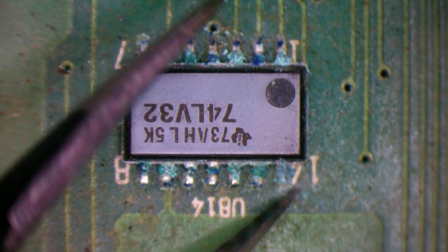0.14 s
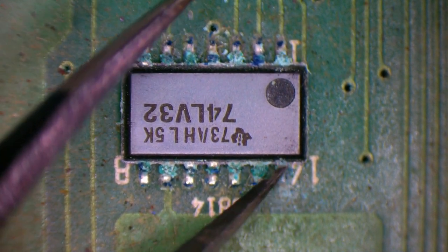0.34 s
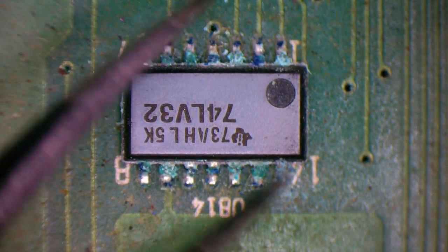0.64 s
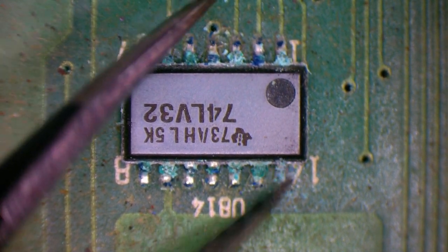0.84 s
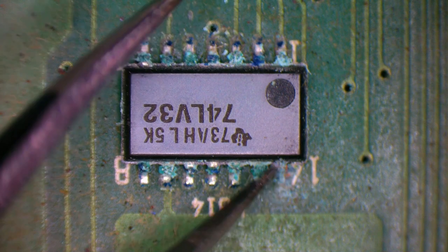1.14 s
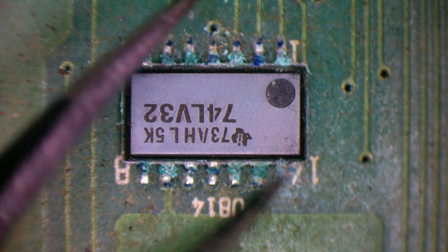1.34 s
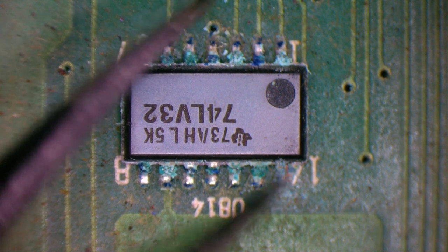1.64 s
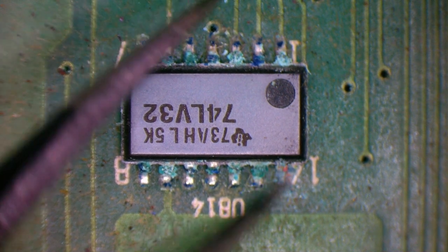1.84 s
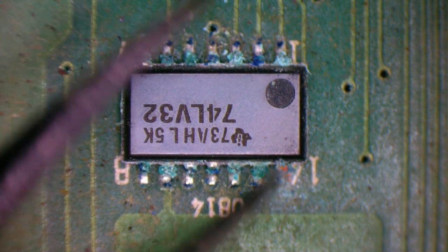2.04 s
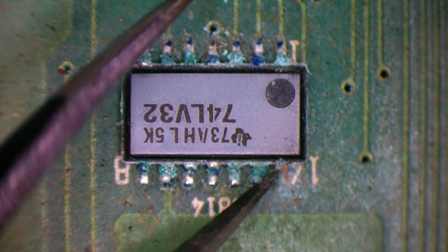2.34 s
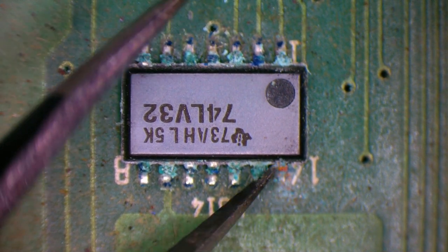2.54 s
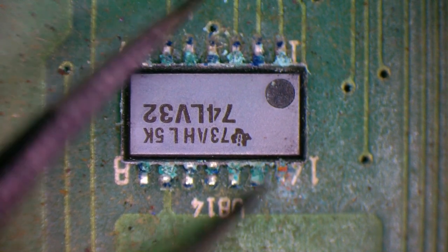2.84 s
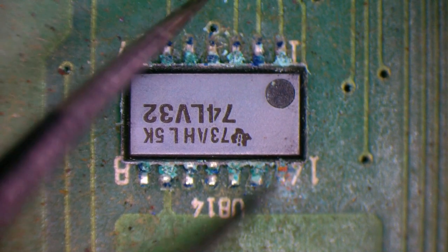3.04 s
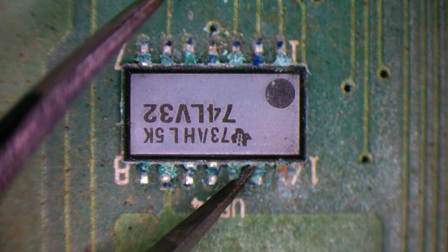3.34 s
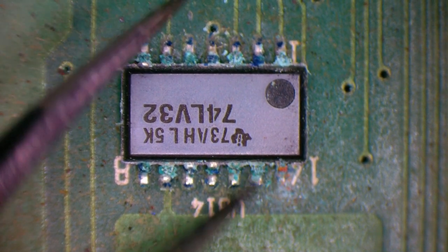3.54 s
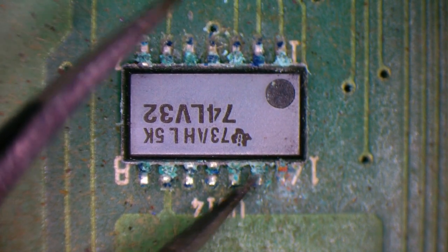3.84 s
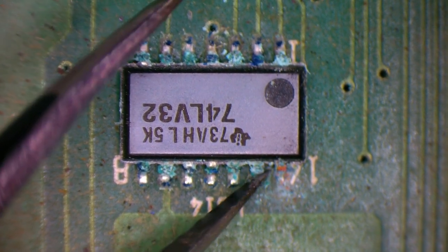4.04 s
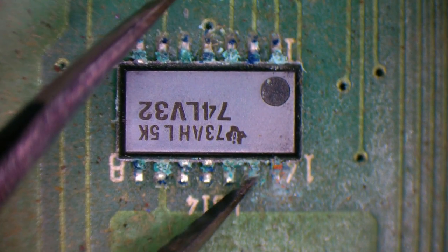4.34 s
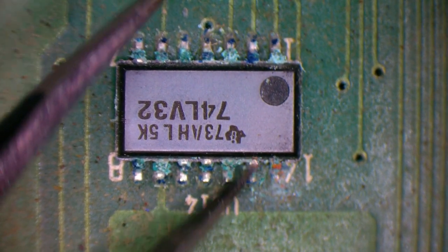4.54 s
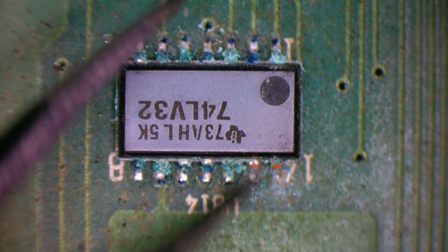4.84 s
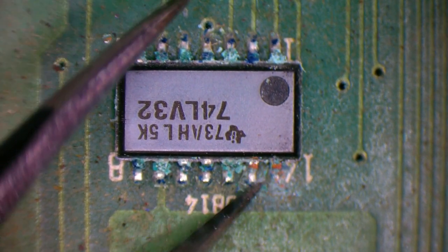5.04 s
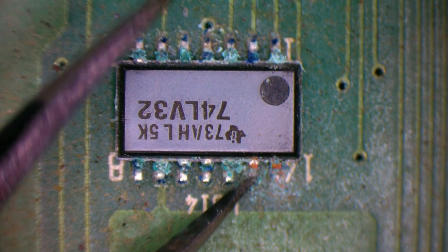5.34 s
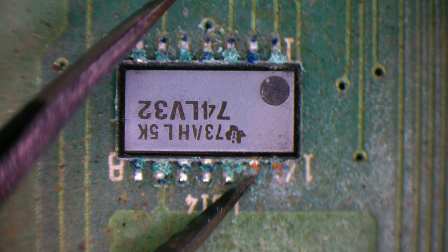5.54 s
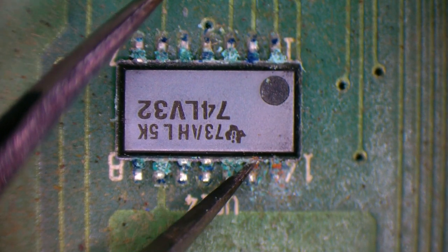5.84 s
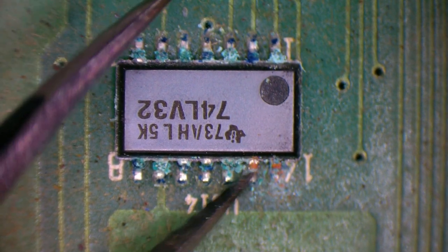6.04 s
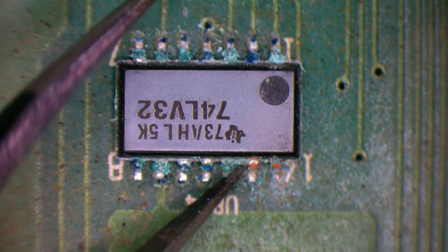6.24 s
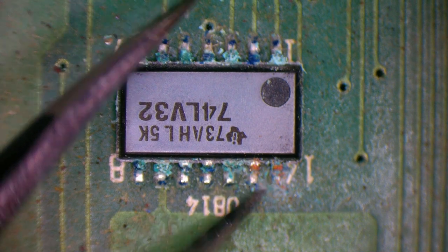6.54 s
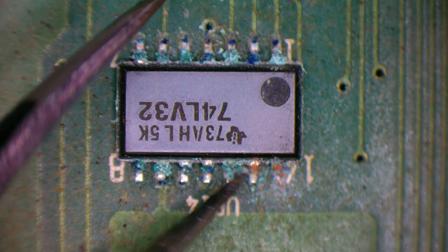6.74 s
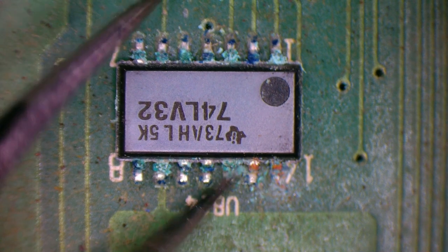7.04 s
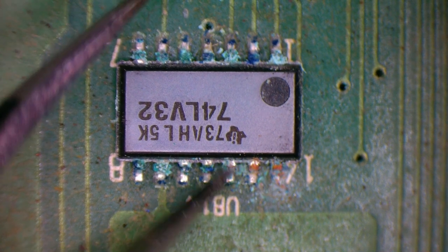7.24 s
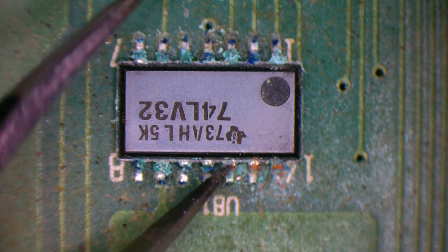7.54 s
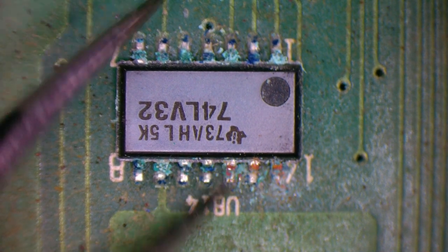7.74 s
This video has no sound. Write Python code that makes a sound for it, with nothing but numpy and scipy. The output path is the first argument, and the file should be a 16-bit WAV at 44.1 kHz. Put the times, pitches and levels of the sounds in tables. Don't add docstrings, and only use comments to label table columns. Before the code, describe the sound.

A steady, deep mains hum with faint overtones, low building rumble and soft amplifier hiss runs throughout. Close up, fine steel tweezer tips pick at chip legs on a circuit board, making tiny, dry, very short clicks. Light catches begin at 0.15 s, with a scratch and snap near 0.35 and a crisp snap at 0.6. Clicks and scrapes gather from 1.1 to 2.2 s, with a strong snap around 1.57 and dull board taps near 1.75 and 1.9. A snap at 2.6 leads to a clearer scrape at 2.8. After sparse ticks from 3 s, scrapes, dull taps and snaps cluster from 3.9 to 4.8. Lighter, scattered ticks follow until 6.3, then a firmer snap at 6.75 and brief grazes. The sharpest late click lands at 7.5, with another at 7.7 and a faint graze near 7.9. Soft low bench thumps accompany many contacts; the close sound has only a slight short reflection.

```python
import sys
import numpy as np
from scipy import signal
from scipy.fft import rfft, irfft
from scipy.io import wavfile
from scipy.ndimage import uniform_filter1d

SR = 44100
rng = np.random.default_rng(int(sys.argv[2]) if len(sys.argv) > 2 else 0)


def waveform_to_disk(signal):
    frames = np.transpose(np.atleast_2d(signal))
    scaled = np.clip(frames, -1, 1) * 32767
    samples = np.round(scaled).astype(np.int16)
    wavfile.write(sys.argv[1], SR, samples)


def boost_factor(decibels):
    exponent = np.asarray(decibels, float) / 20
    return 10 ** exponent


N = 347508

# pitch_hz, level_db, t60_s
BOARD_MODES = [(370, -7, .025), (420, -1, .028), (510, -2, .028), (630, 0, .03), (770, -5, .025),
               (1115, -6, .022)]
SHANK_MODES = [(1510, 1, 0.03), (1780, 1, 0.036), (2028, 1, 0.04), (2365, -21, 0.09)]
NECK_MODES = [(2850, 6, .015), (3165, 4, .012), (3408, 4.5, .012), (3790, -4, .008), (4560, 0, .012),
              (5200, 0, .01)]
TIP_MODES = [(6640, -9, .008), (7300, -1, .005), (7800, 4, .007), (8300, 1, .006), (9220, -4, .006)]
EDGE_MODES = [(9500, 3, .006), (10800, -2, .005), (11900, 2, .006), (13000, -1, .005), (14400, 0, .005),
              (15600, -3, .004)]


def floor():
    # pitch_hz, level_db (per Hz)
    rumble = [(3, -58.5), (10, -60), (26, -61), (33, -80), (62, -83), (90, -85.5), (125, -89)]
    # pitch_hz, level_db (per Hz)
    hiss = [(200, -93.5), (600, -99.5), (1000, -105), (2500, -109), (6000, -113), (15400, -114.5),
            (16000, -124)]
    hz, level_db = np.transpose(np.vstack([rumble, hiss]))
    bins = np.fft.rfftfreq(N, 1 / SR) + 1e-3
    gain = boost_factor(np.interp(np.log(bins), np.log(hz), level_db, left=-120)) * np.sqrt(SR / 2)
    return irfft(rfft(rng.standard_normal(N)) * gain, N)


def hum():
    # multiple, level_db (rms)
    overtones = [(1, -36), (2, -73.5), (3, -62), (5, -70), (7, -84), (9, -75), (11, -96), (17, -83.5)]
    mains_hz = 50.09
    turn = 2 * np.pi * mains_hz * np.arange(N) / SR
    return sum(np.sqrt(2) * boost_factor(db) * np.sin(k * turn + (k - 1) ** 2) for k, db in overtones)


def jolts():
    # start_s, peak_db
    pushes = [(0.147, -54), (.32, -53), (0.766, -49), (0.941, -58), (1.16, -66), (1.366, -54), (1.562, -44),
              (1.749, -57), (1.985, -60), (2.177, -47), (2.948, -51), (3.551, -51), (3.958, -47),
              (4.233, -47), (4.723, -57), (5.137, -54), (5.472, -51), (6.744, -57), (7.001, -72),
              (7.153, -47), (7.347, -50), (7.497, -50), (7.684, -49), (7.859, -50), (6.849, -58)]
    start_hz, end_hz, glide_s = 98.7, 140.5, .045
    attack_s, t60_s = .012, .2
    age = np.arange(8000) / SR
    hz = end_hz - (end_hz - start_hz) * np.exp(-age / glide_s)
    shape = (1 - np.exp(-age / attack_s)) ** 2 * boost_factor(-60 * age / t60_s)
    shape = shape / shape.max()
    out = np.zeros(N + len(age))
    for start_s, peak_db in pushes:
        spot = rng.normal(1, .03)
        tone = np.sin(2 * np.pi * np.cumsum(hz * spot) / SR)
        start = int(start_s * SR)
        out[start:start + len(age)] += boost_factor(peak_db - 6.0) * shape * tone
    return out[:N]


def contact(count, length_ms):
    age_ms = np.arange(256) / SR * 1000
    swell = age_ms * np.exp(-age_ms / length_ms)
    force = rng.standard_normal((count, len(age_ms)))
    for turn in range(4):
        spectrum = rfft(force * swell)
        force = irfft(spectrum / np.abs(spectrum + 1e-12)) / (swell + .15 * swell.max())
    force = force * swell
    return force / np.sqrt(np.sum(force ** 2, axis=1, keepdims=True))


def nook(force, echo_db, t60):
    age = np.arange(3000) / SR
    build = np.clip(age / .005, 0, 1) ** 2
    echoes = rng.standard_normal((len(force), len(age))) * boost_factor(echo_db - 60 * age / t60) * build
    return echoes + np.pad(force, ((0, 0), (0, len(age) - force.shape[1])))


def strike(modes, times, peak_db, rattle, crack_db, spread_db=3.0, size=3000):
    age = np.arange(size) / SR
    hz, mode_db, t60 = np.transpose(modes)[:, :, None]
    grip = 1 + .035 * rng.standard_normal((len(times), len(modes), 1))
    share = boost_factor(mode_db + spread_db * rng.standard_normal(grip.shape))
    ringing = boost_factor(-60 * age / t60) * np.sin(2 * np.pi * hz * grip * age)
    body = np.sum(share * ringing, axis=1)
    edges_hz = [.85 * hz.min(), 1.1 * hz.max()]
    crack = signal.sosfilt(signal.butter(3, edges_hz, "band", fs=SR, output="sos"), age == 0)
    body = body + boost_factor(crack_db) * crack / crack.max()
    blows = signal.fftconvolve(rattle, body, axes=1)[:, :size]
    blows = blows * (boost_factor(peak_db) / np.max(np.abs(blows), axis=1))[:, None]
    out = np.zeros(N + size)
    np.add.at(out, np.round(times * SR).astype(int)[:, None] + np.arange(size), blows)
    return out[:N]


def touches():
    # start_s, peak_db
    dull_touches = [
        (1.7569, -51),
        (1.908, -51.5),
        (3.4, -72),
        (3.9179, -55),
        (4.18, -53),
        (4.335, -59),
        (4.5, -68),
        (4.536, -58),
        (4.7234, -52),
    ]
    s, peak_db = np.transpose(dull_touches)
    push = nook(contact(len(s), length_ms=2.1), echo_db=-40, t60=0.05)
    return strike(BOARD_MODES[:-1], s, peak_db, push, crack_db=4.5)


def ring(force, hz, t60):
    r, w = boost_factor(-60 / (t60 * SR)), 2 * np.pi * hz / SR
    return signal.lfilter([0, np.sin(w)], [1, -2 * r * np.cos(w), r * r], force + 1e-18)


def drags(grit_per_s=5000, uneven_db=3.0):
    # start_s, length_s, level_db, brightness_db
    strokes = [(0.304, 0.13, -71, -9), (0.754, 0.03, -66, 2), (1.138, 0.059, -63, -6),
               (1.5, 0.096, -65.5, 4.5), (1.735, .05, -73, 1), (2.107, .12, -62, -10),
               (2.757, 0.083, -58.5, -3), (3.736, 0.051, -64, -11), (3.894, 0.055, -68, -11),
               (4.3, 0.11, -66, -8), (4.437, 0.037, -74, 8), (4.705, 0.11, -69, -5), (5.737, .05, -78, 9),
               (6.814, 0.077, -74, -1)]
    time, dull, bright = np.arange(N) / SR, np.zeros(N), np.zeros(N)
    for start_s, length_s, db, bright_db in strokes:
        span = [start_s, start_s + length_s]
        level_db = db - 7 * np.array([-.5, .5])
        dull += np.interp(time, span, boost_factor(level_db), left=0, right=0)
        bright += np.interp(time, span, boost_factor(level_db + bright_db), left=0, right=0)
    grains = rng.random(N) < grit_per_s / SR
    heights = boost_factor(uneven_db * np.minimum(rng.exponential(1, N), 4))
    grit = grains * heights * rng.choice([-1, 1], N)
    low_modes = np.vstack([BOARD_MODES, SHANK_MODES, NECK_MODES])
    high_modes = np.vstack([NECK_MODES[-2:], TIP_MODES, EDGE_MODES[:2]])
    low = sum(boost_factor(db) * ring(grit, hz, 0.17 * t60) for hz, db, t60 in low_modes)
    high = sum(boost_factor(db) * ring(grit, hz, 0.2 * t60) for hz, db, t60 in high_modes)
    scrape = uniform_filter1d(dull, size=300) * low / np.std(low)
    hiss = uniform_filter1d(bright, size=300) * high / np.std(high)
    return (scrape + hiss) * boost_factor(-8.5)


def contacts():
    # start_s, neck_peak_db, tip_db, shank_db, board_db
    snap_events = [(.346, -40.5, -3, -9, -1), (0.591, -35.5, 1, -9, -5.5), (0.7704, -48.5, 2, -3, 4),
                   (1.006, -49, 4.5, -8, -19), (1.1429, -40.5, -9.5, -6.5, -1.5), (1.3675, -46, -1, -8, -1),
                   (1.5682, -33.5, 4, -17, -11), (1.9843, -43, 11.5, -26, 0), (2.1617, -35, -4.5, -18, -3),
                   (2.5735, -39, 3, -6, 3), (3.018, -44.5, 5, -8, -8), (3.955, -52, 10, 2, 6.5),
                   (4.2433, -41, 5, -3.5, -25), (4.3623, -50, 5, -3, 4.5), (4.565, -45, -5.5, 0, 2.5),
                   (4.762, -43.5, 3, -17, 2.5), (5.4796, -46, 0, -3, -3), (5.6657, -47.5, 2.5, -2.5, 2),
                   (6.313, -44, -3.5, -6, -4.5), (6.7448, -38, -1, -10, -3.5), (7.004, -52, 12, -17, -9),
                   (7.1586, -42.5, -0.5, -21, -23), (7.5021, -32, -1, -8.5, -6),
                   (7.6884, -39, -4, -30, -6.5)]
    # start_s, neck_peak_db, tip_db, board_db
    slip_events = [(0.1438, -47.5, -3.5, -9), (0.1573, -52, -6, 6), (0.3201, -46, -18, 4.5),
                   (0.3243, -56, -18, 3), (.7643, -47, -7, -14), (1.127, -69, -10, 23),
                   (1.3614, -43.5, -21, -20), (1.509, -48.5, -13, -13), (1.5166, -54, -8, 11),
                   (1.5531, -39, -11, -24), (1.565, -39, -11, -0.5), (1.7482, -45.5, -7, 5),
                   (1.752, -44.5, -12, 4.5), (1.7614, -51, -7, 9.5), (2.1698, -56, -11, -5),
                   (2.192, -51.5, 0, -19), (2.333, -54, -11, 7.5), (2.342, -50, -13, -10),
                   (2.788, -49, -10, -11), (2.792, -48.5, -5, 3), (3.2497, -54.5, 5, 9),
                   (3.2563, -50, -1, -3), (3.5596, -48.5, 2, -6), (3.9215, -53, -20, 9),
                   (4.2337, -41, -8, -19), (4.3726, -47.5, -5, -1), (4.948, -51, -1, 3),
                   (5.1313, -61.5, 9, 22), (5.1354, -47.5, -1.5, 4.5), (7.3561, -50.5, 3.5, 2)]
    # start_s, neck_peak_db, tip_db
    graze_events = [(.1836, -60, -2), (0.3617, -50, -9), (.5131, -57, -15), (.939, -54, -9),
                    (1.5585, -48, -10), (2.1998, -65, 11), (2.384, -62, 9.5), (2.764, -55.5, 1),
                    (2.7795, -47, -15), (2.802, -60, 4), (3.742, -52.5, -15), (4.664, -72, 13),
                    (4.4509, -76, 21), (4.4584, -58, -5), (4.467, -56, 2), (4.944, -51, -3),
                    (5.3521, -59, 2), (5.6586, -63, 11), (5.7619, -71, 17.5), (5.965, -73, 22),
                    (6.0154, -51.5, -1.5), (6.4779, -75, 22), (6.836, -50.5, -15), (6.8417, -56, 5),
                    (6.846, -57, 7.5), (6.906, -50, -15), (7.4936, -52, -20), (7.4974, -62, 6),
                    (7.679, -70, 18), (7.8677, -53, -5)]
    snaps = np.array([(s, db, db + tip, db + shank, db + board) for s, db, tip, shank, board in snap_events])
    rebounds = snaps + [.0045, -7, -12, -25, 0]
    first_knocks = snaps + [0, 0, 0, 0, -3]
    slips = [(s, db, db + tip, db - 5.5, db + board) for s, db, tip, board in slip_events]
    grazes = [(s, db, db + tip, db - 5, db - 30) for s, db, tip in graze_events]
    return np.vstack([first_knocks, rebounds, slips, grazes])


def picks():
    s, neck_db, tip_db, shank_db, board_db = contacts().T
    firm_db = -43
    edge_db = firm_db - 1 + 1.15 * (tip_db - firm_db)
    slip, knock = contact(len(s), length_ms=.6), contact(len(s), length_ms=1.3)
    high = nook(slip, echo_db=-32.5, t60=0.064)
    low = nook(slip[::-1], echo_db=-30, t60=0.11)
    thud = nook(knock, echo_db=-26.0, t60=0.12)
    edge = strike(EDGE_MODES, s, edge_db, high, crack_db=9.0)
    tip = strike(TIP_MODES, s, tip_db + 1.6, high, crack_db=2.5)
    neck = strike(NECK_MODES, s, neck_db - 1.2, low, crack_db=3.5)
    shank = strike(SHANK_MODES, s, shank_db + 0.17, low, crack_db=10.5)
    board = strike(BOARD_MODES, s, board_db - 6.0, thud, crack_db=-7.0)
    return edge + tip + neck + shank + board


def scene():
    background = floor() + hum()
    tool = jolts() + touches() + drags() + picks()
    return (background + tool)[None]


def low_pass(x):
    return signal.sosfilt(signal.butter(12, 16810, fs=SR, output="sos"), x)


def record(dry):
    lowpass = signal.cheby2(10, 32, 16250, fs=SR, output="sos")
    mix = signal.sosfilt(lowpass, dry)
    return low_pass(mix)


dry = scene()
out = record(dry)
waveform_to_disk(out)
```